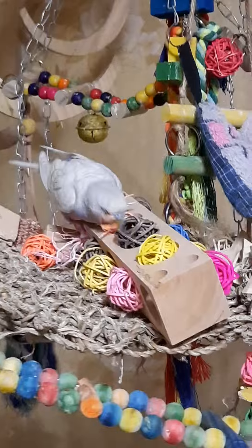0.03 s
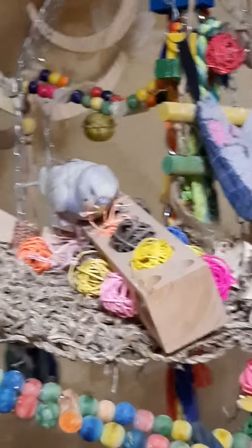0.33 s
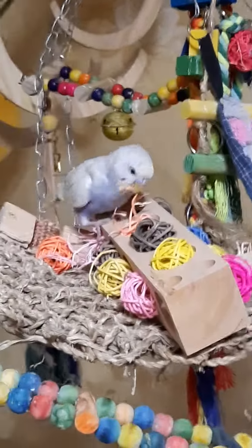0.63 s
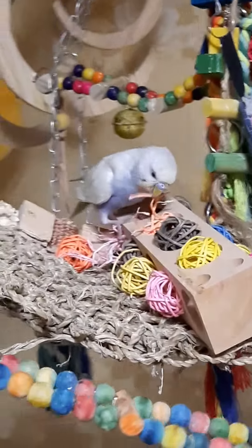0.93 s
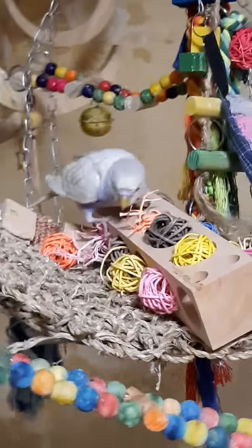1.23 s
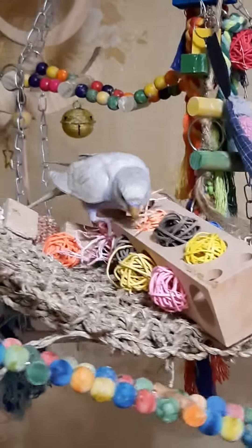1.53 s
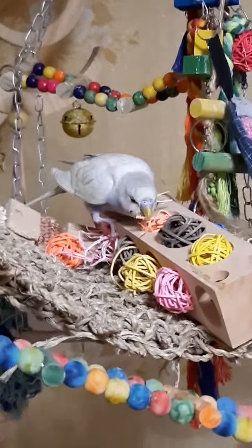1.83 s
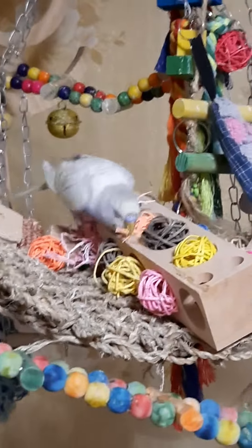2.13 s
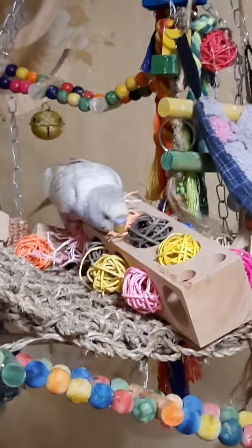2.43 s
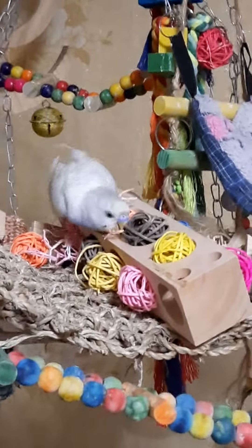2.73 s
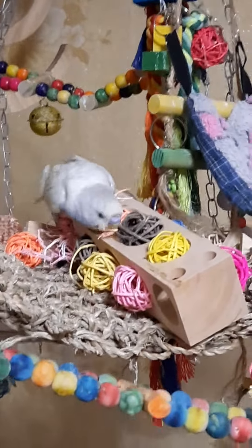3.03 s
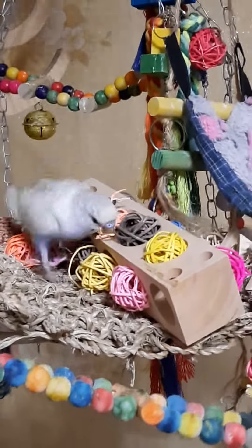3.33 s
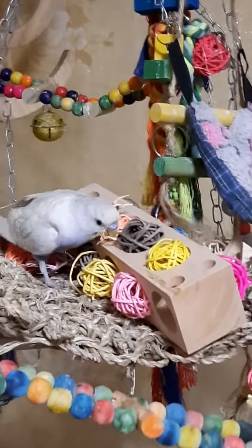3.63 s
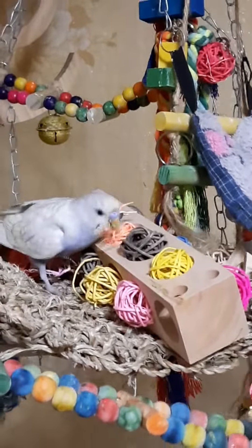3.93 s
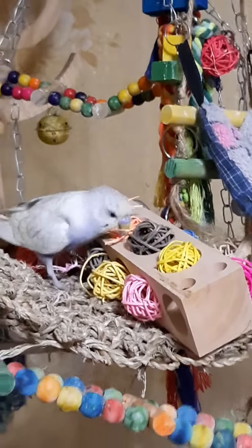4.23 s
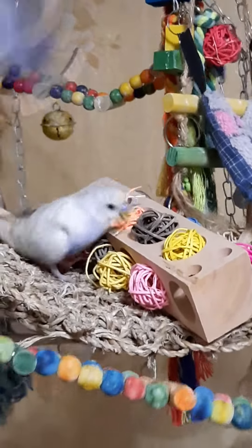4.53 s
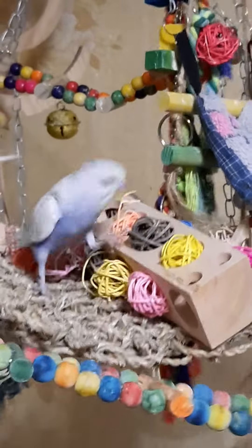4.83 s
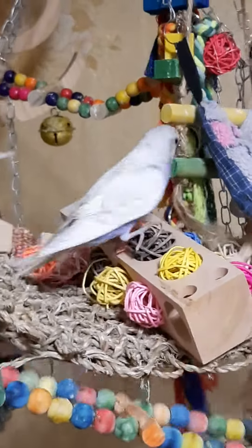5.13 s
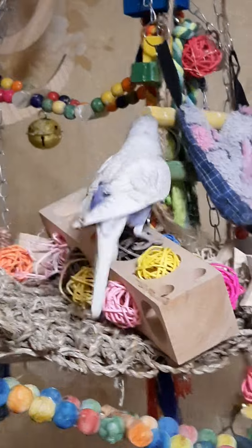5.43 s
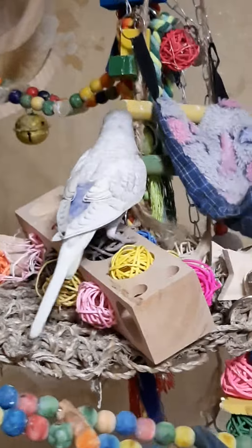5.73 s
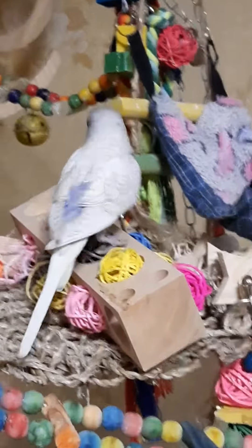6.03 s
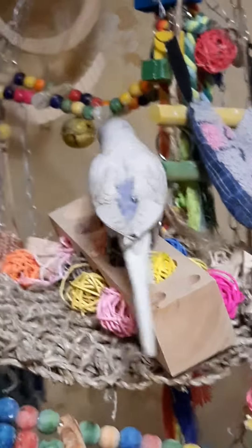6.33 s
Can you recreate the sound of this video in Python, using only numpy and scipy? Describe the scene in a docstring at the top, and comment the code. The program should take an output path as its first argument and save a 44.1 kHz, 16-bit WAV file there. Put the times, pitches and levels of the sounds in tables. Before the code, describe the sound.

A budgie mutters and chirps to itself a short way from the microphone, slightly left, over a faint appliance hum. Its pecks snap dryly on wood and its tugs rustle woven fibres and jog a thin little bell. After a soft flutter of wings comes a burst of five loud, rasping squawks, the first two joined by a nasal call, then some light chirps. The walls of the small room give each sound a short ring.

```python
"""A budgie in a small, live room, a short way from a stereo microphone and a little to its left.
An appliance hums throughout. The bird warbles softly as it picks at a wooden toy on a woven mat;
its tugs crackle the fibres and tinkle a little bell. Near 3 s it shakes its feathers, then flaps and
hops onto the block. Just after 5 s it scolds with five harsh squawks, puffs of air from its syrinx,
a nasal call linking the first two. A few chirps and a last peck follow; the walls answer each sound."""
import sys
import numpy as np
from scipy import signal
from scipy.fft import rfft, irfft, next_fast_len
from scipy.io import wavfile
from scipy.ndimage import map_coordinates

SR = 44100
rng = np.random.default_rng(int(sys.argv[2]) if len(sys.argv) > 2 else 0)


def master_out(mix):
    """Clip the mix to full scale and print it as 16-bit PCM to the path in sys.argv[1]."""
    frames = np.transpose(np.atleast_2d(mix))
    ceiling = np.clip(frames, -1, 1)
    pcm = np.round(ceiling * 32767).astype(np.int16)
    wavfile.write(sys.argv[1], SR, pcm)


N = 290178


# resonances of the bird's throat: frequency_hz, level_db
THROAT_SPECTRUM = [(300, -37), (800, -29), (1400, -14.5), (2000, -10.5), (3200, -4), (4500, -6),
                   (5900, 1.5), (7100, -2.5), (8300, 0), (9500, -19.5), (12700, -9), (15500, -22)]
# the scolding: start_s, full_force_s, end_s, level_db, whistle_hz, ripple_db
SQUAWK_EVENTS = [(5.168, 5.21, 5.23, -20, 1850, 1.5), (5.45, 5.498, 5.523, -18.5, 1910, 1.5),
                 (5.592, 5.609, 5.656, -18.5, 2950, 2), (5.933, 5.963, 6.0006, -22, 2720, 3),
                 (6.164, 6.181, 6.2, -29.5, 2705, 6.5)]
def squawks(gain_db=1, swell_db=25, tick_decay_s=0.0012, extra_decay_s=0.00086):
    """Harsh pulse trains swell and stop short, the loudest calls to reach the microphone."""
    out = np.zeros(N)
    for start, full, end, db, whistle_hz, ripple_db in SQUAWK_EVENTS:
        t = clock(end - start + 0.07)
        force = np.minimum(t / (full - start), 1)
        swell = amp(-swell_db * (1 - force) ** 1.93)
        # separate ticks at first, merging into a rasp as the force grows
        train = puffs(t, rate_hz=190, jitter=0.12, decay_s=tick_decay_s + extra_decay_s * force ** 2)
        # the chopped whistle survives only as broad humps at its harmonics
        humps_db = lambda hz: ripple_db * np.cos(2 * np.pi * hz / whistle_hz)
        cry = coloured(train, lambda hz: along(THROAT_SPECTRUM, hz) + humps_db(hz))
        add(out, start, amp(db + gain_db) * swell * gate(t, end - start, 0.006, 0.0014) * cry)
    return out


# harmonics of the nasal voice: harmonic_number, level_db
NASAL_HARMONICS = [(1, -1.5), (2, -1.5), (3, -16), (4, -18), (5, -33), (6, -21.5)]
# course of the call: time_s, pitch_hz, level_db
CALL_CONTOUR = [(5.255, 1797, -31), (5.288, 1795, -34), (5.3, 1875, -25), (5.357, 2019, -26),
                (5.395, 1846, -29.5), (5.437, 1730, -29), (5.474, 1967, -25)]
def nasal_call(gain_db=1.7, quaver=0.025, flicker_db=3.0, rasp_db=-18):
    """A wavering, reedy tone with a hoarse edge links the first two squawks."""
    times, hz, db = np.transpose(CALL_CONTOUR)
    start, length = times[0], times[-1] - times[0]
    out, t = np.zeros(N), clock(length + .03)
    pitch = np.interp(t + start, times, hz) * np.exp(quaver * wobble(1500, len(t)))
    level = amp(np.interp(t + start, times, db) + gain_db + flicker_db * wobble(171.5, len(t)))
    reed = voice(pitch, NASAL_HARMONICS) + amp(rasp_db) * noise(THROAT_SPECTRUM, size=len(t))
    add(out, start, level * gate(t, length, 0.0079, 0.0039) * reed)
    return out


# the favourite phrase, a high chirp then a lower one: start_s, first_db, second_hz, second_db
PHRASE_EVENTS = [(1.503, -47.5, 3085, -41), (1.828, -44.5, 3343, -40), (3.045, -54.5, 2510, -46),
                 (4.338, -44, 2483, -44)]
# lone chirps, rising or falling: start_s, first_hz, last_hz, level_db
LONE_CHIRPS = [(.875, 3140, 2930, -46), (1.384, 1790, 2140, -46), (1.627, 1760, 2810, -48),
               (1.932, 1802, 1998, -50), (2.742, 1720, 1380, -62), (3.624, 1890, 2595, -34),
               (4.088, 1847, 2170, -47.5), (4.153, 1052, 802, -49.5), (4.256, 1414, 1166, -49),
               (4.435, 1504, 1002, -48), (4.572, 3007, 2884, -41), (4.664, 2070, 1315, -36.5),
               (6.324, 3900, 3370, -38), (6.35, 2298, 1107, -46), (6.41, 2416, 1092, -39)]
def warble(opening_hz=4065, step_s=.056, drop_hz=554):
    """Down on the mat the bird sings to itself: falling two-note phrases among lone chirps."""
    out, notes = np.zeros(N), list(LONE_CHIRPS)
    for start, first_db, second_hz, second_db in PHRASE_EVENTS:
        notes.append((start, opening_hz, opening_hz - drop_hz, first_db))
        notes.append((start + step_s, second_hz, second_hz - drop_hz, second_db))
    for start, first_hz, last_hz, db in notes:
        add(out, start, amp(db) * chirp(first_hz, last_hz))
    return out


# harmonics of the whistle: harmonic_number, level_db
WHISTLE_HARMONICS = [(1, 3.5), (2, -10.5), (3, -18.5)]
def chirp(first_hz, last_hz, length_s=.037, quaver=.03, flicker_db=3.5, hoarse_db=-8):
    """A short, slightly hoarse whistle slides evenly between two pitches."""
    t = clock(length_s + .026)
    slide = first_hz * (last_hz / first_hz) ** np.minimum(t / length_s, 1)
    pitch = slide * np.exp(quaver * wobble(452, len(t)))
    tone = unit(voice(pitch, WHISTLE_HARMONICS) * amp(flicker_db * wobble(203, len(t))))
    rasp = rattle(t, np.sqrt(first_hz * last_hz), width_octaves=0.43)
    return gate(t, length_s, 0.0014, 0.0016) * unit(tone + amp(hoarse_db) * rasp)


# hoarse chuckles between the notes: start_s, length_s, centre_hz, level_db
CHUCKLE_EVENTS = [(0, .015, 2080, -54.5), (0.255, 0.35, 1850, -63.5), (0.663, 0.074, 1850, -52),
                  (0.852, 0.059, 3300, -48.5), (1.013, 0.049, 2900, -45.5), (1.157, 0.071, 1280, -54.5),
                  (1.298, 0.066, 3170, -45), (1.48, 0.025, 2500, -46.5), (1.856, 0.017, 2350, -46),
                  (2.164, 0.051, 1510, -58.5), (3.514, 0.033, 3560, -37), (3.552, 0.035, 3200, -34),
                  (3.621, 0.045, 2770, -37.5), (3.913, 0.022, 3140, -46.5), (4.05, .025, 2130, -47),
                  (4.159, .046, 2180, -46.5), (4.257, 0.041, 2190, -48), (4.548, 0.084, 2420, -42.5),
                  (4.709, 0.013, 2840, -28.5), (5.848, 0.073, 2830, -46.5), (6.291, 0.012, 4040, -38),
                  (6.319, 0.037, 6020, -40)]
def chuckles(gain_db=1):
    """The bird's toneless rattles, from broad mutters to bright rasps."""
    out = np.zeros(N)
    for start, length, hz, db in CHUCKLE_EVENTS:
        t = clock(length + 0.013)
        width_octaves = 0.51 * (3240 / hz) ** 0.57  # a higher rasp is narrower
        rasp = rattle(t, hz, width_octaves)
        add(out, start, amp(db + gain_db) * gate(t, length, 0.00096, 0.0019) * rasp)
    return out


# soft nasal mews: start_s, first_hz, level_db
MEW_EVENTS = [(2.276, 1000, -68), (2.58, 1059, -59.5), (5.846, 1628, -45.5)]
def mews(length_s=0.094, octaves_per_s=3, quaver=0.0284, flicker_db=4.0, hoarse_db=-11):
    """The reedy voice of the nasal call, used softly and drawn upwards."""
    out, t = np.zeros(N), clock(length_s + .03)
    for start, hz, db in MEW_EVENTS:
        pitch = hz * 2 ** (octaves_per_s * t) * np.exp(quaver * wobble(449.4, len(t)))
        reed = voice(pitch, NASAL_HARMONICS) + amp(hoarse_db) * rattle(t, 2 * hz, width_octaves=0.69)
        level = amp(db + flicker_db * wobble(203, len(t)))
        add(out, start, level * gate(t, length_s, 0.018, 0.0015) * reed)
    return out


# colour of a dry snap: frequency_hz, level_db
SNAP_SPECTRUM = [(350, -58), (600, -42), (2120, -5.5), (3530, -5.5), (5260, 3), (9620, -14.5), (10300, -5),
                 (14100, -10), (16000, -10.5)]
# blows of beak and claws: start_s, level_db
PECK_EVENTS = [(0.5559, -40), (1.4592, -39), (2.794, -46.5), (2.9156, -41), (3.1704, -35), (3.2664, -23.5),
               (3.2814, -31), (3.3224, -19.5), (3.8321, -33.5), (4.7162, -17.5), (4.9281, -33.5),
               (5.0739, -39.5), (6.5015, -37.5)]
def pecks(gain_db=-1, decay_s=0.0016):
    """Beak and claws strike wood and wicker, each a crack a few milliseconds long."""
    blows, t = np.zeros(N), clock(.03)
    for start, db in PECK_EVENTS:
        add(blows, start, amp(db + gain_db) * np.exp(-t / decay_s))
    return blows * noise(SNAP_SPECTRUM)


# colour of the hiss: frequency_hz, level_db
HISS_SPECTRUM = [(400, -36), (1500, 2.5), (4000, -3.5), (8000, 0), (9500, -9.5), (15000, 0.5)]
# long spells and short bursts of hiss: start_s, length_s, level_db
HISS_EVENTS = [(0.545, 0.87, -68.5), (1.464, 0.07, -56), (1.831, 0.1, -66), (1.95, 1.1, -81.5),
               (2.912, 4.8, -66), (3.795, 0.042, -52), (4.371, 0.036, -44)]
def crackly_hiss(gain_db=4, crackles_per_s=130, spread_db=7, decay_s=0.0026):
    """High, crackly hiss: rustling wicker and, at 1.83 s, the breathy top of a chirp."""
    level = np.zeros(N)
    for start, length, db in HISS_EVENTS:
        add(level, start, amp(db) * gate(clock(length + .1), length, 0.011, .012))
    crackles = rng.random(N) < crackles_per_s / SR
    strength = amp(spread_db * np.clip(rng.standard_normal(N), -2, 2))
    grains = unit(signal.lfilter([1], [1, -np.exp(-1 / (decay_s * SR))], crackles * strength))
    return amp(gain_db) * level * grains * noise(HISS_SPECTRUM)


# modes of the little bell: frequency_hz, level_db, t60_s
BELL_MODES = [(4382, -12, .6), (10508, -6, .45), (10584, 2, .62), (15396, -2, .45)]
# jogs of the bell: start_s, level_db, top_mode_extra_db
BELL_JOGS = [(.81, -66.5, -4), (.903, -63.5, 6), (1.168, -47.5, 0), (1.808, -64, 6), (3.268, -53, 13),
             (3.305, -43.5, 0), (4.051, -40.5, -2), (4.167, -47.5, 4), (4.49, -51.5, 1), (4.63, -45.5, 2),
             (4.77, -56, 11)]
def bell(gain_db=-1, tick_db=-5, sway_db=3.5):
    """At every jog the pellet ticks and rings the same thin modes, which waver as the bell swings."""
    out, t = np.zeros(N), clock(.7)
    onset = 1 - np.exp(-t / 0.0022)
    for start, db, top_db in BELL_JOGS:
        modes = []
        for hz, mode_db, t60 in BELL_MODES:
            envelope = amp(mode_db + sway_db * wobble(55, len(t)) - 60 * t / t60)
            modes.append(envelope * np.sin(2 * np.pi * hz * t))
        ring = sum(modes[:-1]) + amp(top_db) * modes[-1]
        tick = amp(tick_db) * np.exp(-t / 0.005) * noise(SNAP_SPECTRUM, size=len(t))
        add(out, start, amp(db + gain_db) * (ring * onset + tick))
    return out


# colour of the draught from the wings: frequency_hz, level_db
WING_SPECTRUM = [(18, -39), (30, -6), (81, 4.5), (263, -10.5), (372, 2.5), (542, -6.5), (802, -12),
                 (1100, -17), (1430, -65), (2420, -120)]
# feather shakes and flaps: start_s, length_s, level_db
FLUTTER_EVENTS = [(2.874, 0.15, -65), (3.075, 0.44, -61), (3.747, 0.042, -75), (4.529, 0.088, -49.5),
                  (4.589, 0.071, -47)]
def flutter(beat_hz=23, depth_db=4):
    """Beating feathers push soft, low gusts of air to the microphone."""
    push = np.zeros(N)
    for start, length, db in FLUTTER_EVENTS:
        t = clock(length + .08)
        beats = amp(db + depth_db * np.sin(2 * np.pi * beat_hz * t))
        add(push, start, beats * gate(t, length, 0.0096, 0.025))
    return push * noise(WING_SPECTRUM)


# a murmur, then hoots: start_s, length_s, centre_hz, level_db
LOW_TONE_EVENTS = [(.255, .3, 758, -65.5), (1.068, 0.25, 429, -55.5), (2.897, 0.068, 446, -57.5),
                   (4.961, 0.073, 452, -54), (5.036, 0.39, 600, -58)]
def low_tones():
    """Faint, low, narrow tones: the bird's soft opening murmur, then a few dull hoots."""
    out = np.zeros(N)
    for start, length, hz, db in LOW_TONE_EVENTS:
        t = clock(length + .015)
        tone = rattle(t, hz, width_octaves=80 / hz)
        add(out, start, amp(db) * gate(t, length, 0.0021, 0.0056) * tone)
    return out


# tones of the appliance: frequency_hz, level_db
HUM_TONES = [(188, -79), (333, -75), (380, -67.5)]
def appliance_hum(waver_db=2.0, drift_rad=0.11):
    """An appliance hums in the room, wavering a little, the same in both channels."""
    out, t = np.zeros(N), np.arange(N) / SR
    for hz, db in HUM_TONES:
        peak = np.sqrt(2) * amp(db + waver_db * wobble(13, N))
        out += peak * np.sin(2 * np.pi * hz * t + drift_rad * wobble(2.6, N))
    return out


# colour of the quiet room: frequency_hz, level_db
AIR_SPECTRUM = [(20, -72), (60, -10), (180, -14), (240, -16.5), (350, -2.5), (480, -14), (800, -25),
                (3400, -30.5), (8000, -29), (16000, -57)]
def room_tone(level_db=-71, side_db=-7):
    """Still air all around the microphone, slightly different left and right."""
    mid, side = noise(AIR_SPECTRUM), noise(AIR_SPECTRUM)
    return amp(level_db) * (mid + amp(side_db) * side * [[1], [-1]])


# how long the walls ring: frequency_hz, t60_s
ROOM_DECAY = [(200, 0.48), (2000, 0.37), (6000, 0.3), (15000, 0.22)]
def room(x, wet_db, direct_db, pan_db=1.5, left_lead_s=.00011, build_s=0.00033):
    """The straight path favours the microphone's left side; the walls answer from all around."""
    hz, t, spectra = signal.stft(rng.standard_normal((2, SR // 2)), SR, nperseg=256)
    decay = amp(-60 * t / along(ROOM_DECAY, hz)[:, None])
    tail = signal.istft(spectra * decay, SR, nperseg=256)[1]
    tail *= 1 - np.exp(-np.arange(tail.shape[1]) / (build_s * SR))
    echo = signal.fftconvolve(x[None], tail / np.linalg.norm(tail[0]), axes=1)[:, :N]
    direct = np.array([x, np.roll(x, round(left_lead_s * SR))])
    return (amp(direct_db) * direct + amp(wet_db) * echo) * amp([[pan_db], [-pan_db]])


def puffs(t, rate_hz, jitter, decay_s):
    """Uneven openings of the syrinx, each a puff of noise that dies quickly."""
    cycles = np.cumsum(rate_hz * np.exp(jitter * wobble(rate_hz, len(t)))) / SR
    return np.exp(-(cycles % 1) / (rate_hz * decay_s)) * rng.standard_normal(len(t))


def rattle(t, centre_hz, width_octaves):
    """Hoarse puffs through one throat resonance."""
    train = puffs(t, rate_hz=180, jitter=.25, decay_s=0.0049)
    detuning = lambda hz: np.log2((hz + 1) / centre_hz) / width_octaves
    return coloured(train, lambda hz: -28 * np.log10(1 + detuning(hz) ** 2 / 2))


def voice(pitch, harmonics):
    """A harmonic tone of rms 1 that follows a pitch curve."""
    phase = 2 * np.pi * np.cumsum(pitch) / SR
    return unit(sum(amp(db) * np.sin(k * phase) * (k * pitch < SR / 2) for k, db in harmonics))


def noise(spectrum, size=N):
    """Noise of rms 1 with the given colour."""
    return coloured(rng.standard_normal(size), lambda hz: along(spectrum, hz))


def coloured(x, db_of_hz):
    """Pass x through a resonance curve and bring it to rms 1."""
    size = next_fast_len(len(x))
    response = amp(db_of_hz(np.fft.rfftfreq(size, 1 / SR)))
    return unit(irfft(rfft(x, size) * response, size)[:len(x)])


def gate(t, length_s, rise_s, fall_s):
    """Swell, hold until length_s, then die away."""
    return (1 - np.exp(-t / rise_s)) * np.exp(-np.maximum(t - length_s, 0) / fall_s)


def wobble(rate, size):
    """A smooth, bounded random curve with rate knots a second."""
    knots = np.clip(rng.standard_normal(int(size * rate / SR) + 4), -2, 2)
    return map_coordinates(knots, [np.arange(size) * rate / SR])


def along(points, hz):
    """Read (frequency_hz, value) points on a log axis."""
    frequencies, values = np.transpose(points)
    return np.interp(np.log(hz + 1), np.log(frequencies + 1), values)


def add(track, start_s, sound):
    """Mix a sound into a track."""
    part = track[max(round(start_s * SR), 0):][:len(sound)]
    part += sound[:len(part)]


def clock(seconds):
    """Sample times of a stretch."""
    return np.arange(max(int(seconds * SR), 16)) / SR


def amp(db):
    """Decibels to gain."""
    return 10 ** (np.asarray(db) / 20)


def unit(x):
    """Scale to rms 1."""
    return x / np.sqrt(np.mean(x ** 2) + 1e-20)


def scene():
    """Bird, toy and bell left of centre in the humming room; bell and wings sound driest and nearest."""
    chatter = room(warble() + mews() + chuckles() + low_tones(), wet_db=-0.5, direct_db=-3.5)
    scolding = room(squawks() + nasal_call(), wet_db=-3.0, direct_db=-3.5)
    crackle = room(pecks() + crackly_hiss(), wet_db=2.5, direct_db=-0.5)
    jingle = room(bell(), wet_db=-7, direct_db=0, pan_db=3, left_lead_s=0)
    draught = room(flutter(), wet_db=-8, direct_db=0, pan_db=2)
    return chatter + scolding + crackle + jingle + draught + appliance_hum() + room_tone()


def record(dry, top_hz=16100):
    """The microphone keeps nothing above its band limit."""
    size = next_fast_len(N + SR // 4)
    passband = np.fft.rfftfreq(size, 1 / SR) < top_hz
    return irfft(rfft(dry, size) * passband, size)[:, :N]


dry = scene()
out = record(dry)
master_out(out)
```